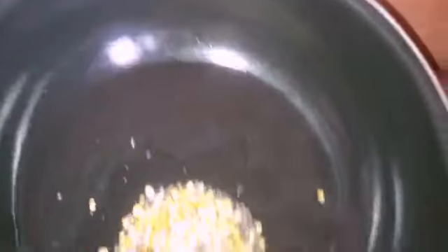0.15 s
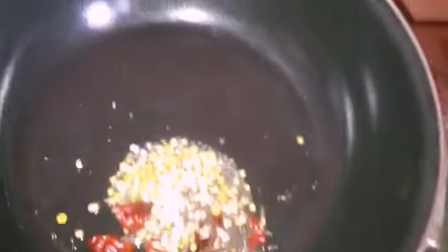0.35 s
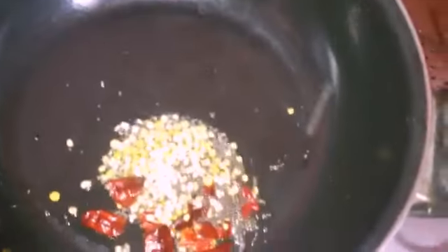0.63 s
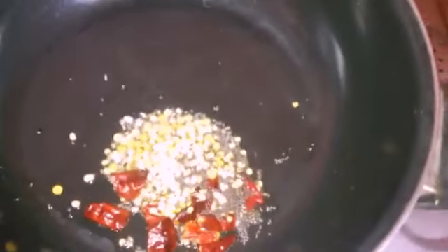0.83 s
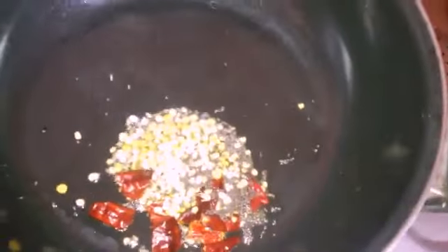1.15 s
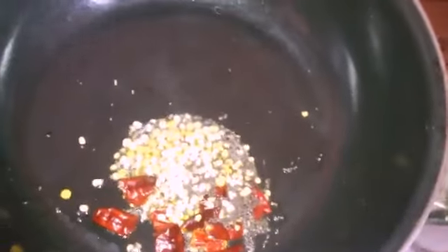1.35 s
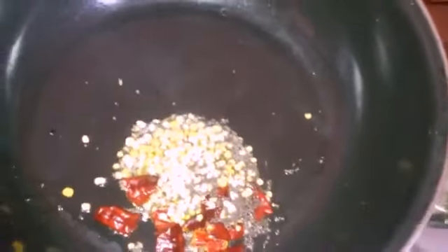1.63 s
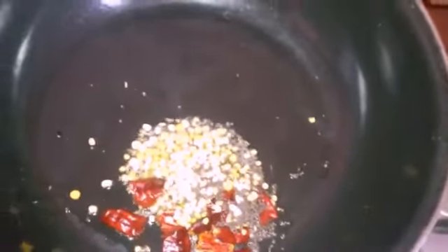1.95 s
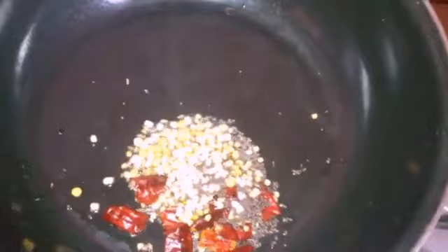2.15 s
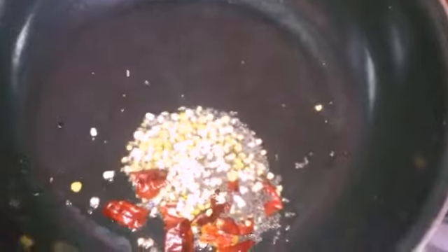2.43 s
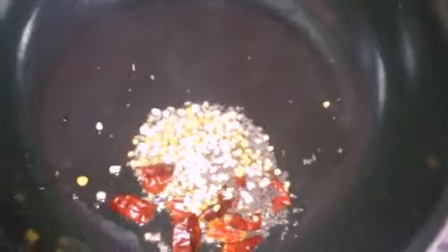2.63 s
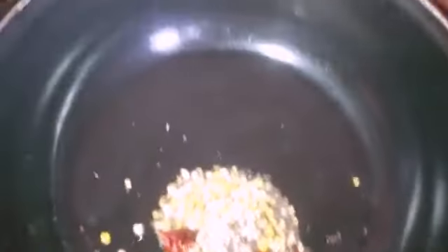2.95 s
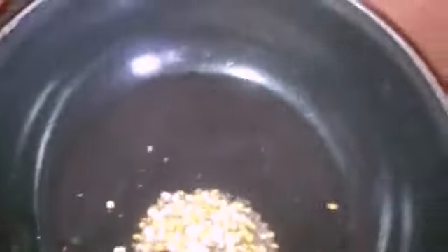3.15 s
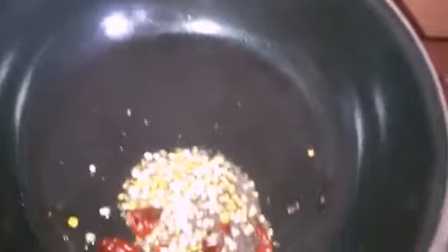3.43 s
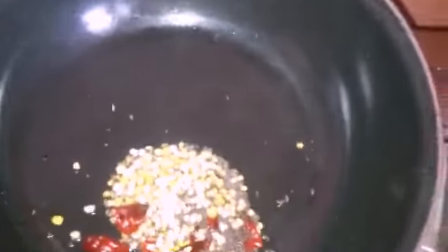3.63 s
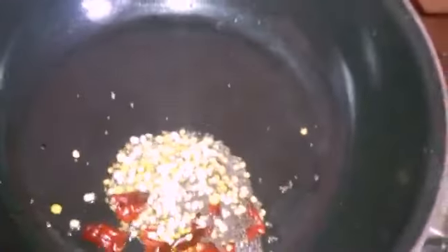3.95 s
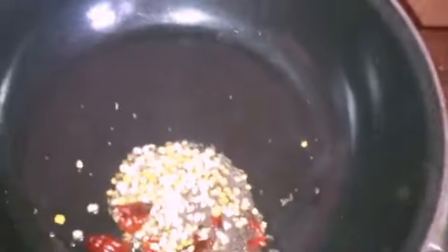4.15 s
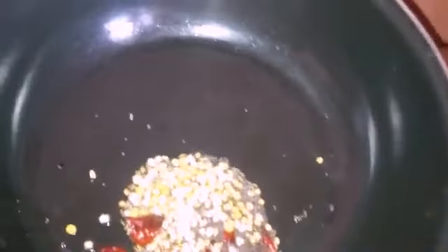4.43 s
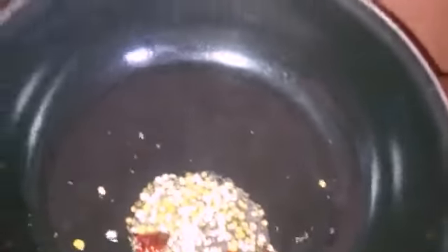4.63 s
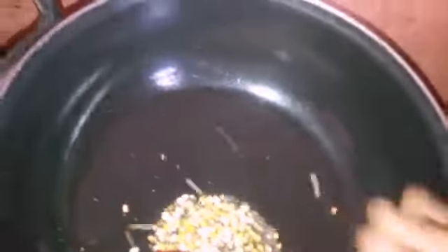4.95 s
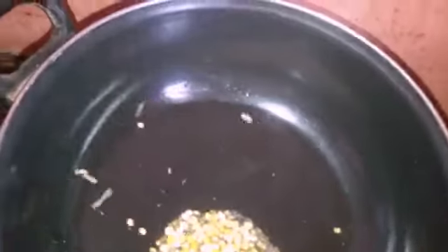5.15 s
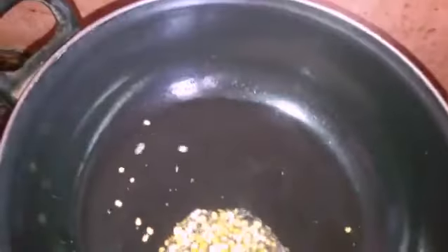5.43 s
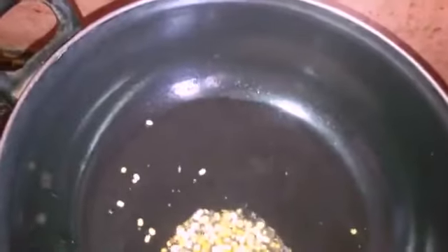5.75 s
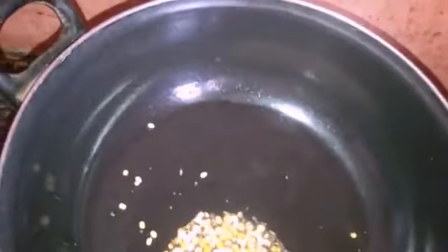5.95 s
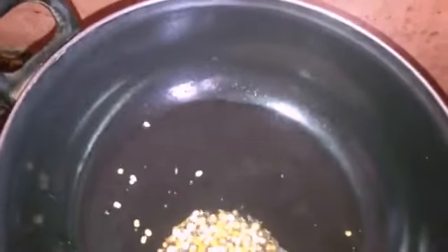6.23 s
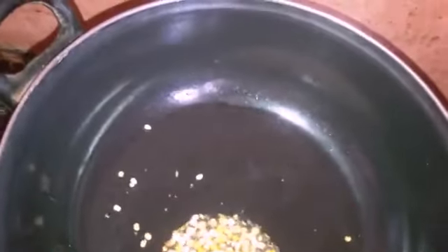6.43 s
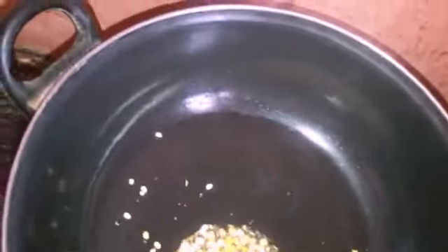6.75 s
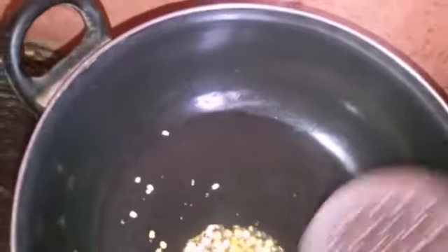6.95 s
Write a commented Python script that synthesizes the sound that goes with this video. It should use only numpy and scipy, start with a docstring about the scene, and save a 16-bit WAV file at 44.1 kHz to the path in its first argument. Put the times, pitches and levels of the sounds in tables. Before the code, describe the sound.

Close to a phone in a small kitchen, lentils and seeds fizz thinly in oil, with bright, dry pops at irregular gaps. Early on something is set down with a dull thud. Light steel touches and slides follow, then a firmer ringing clink past the middle. A cluster of hissing, whistling spits breaks out, and finally a spatula rasps and knocks out of its holder over the low flame drone.

```python
"""A pan of frying seeds fizzes and pops close by; something thuds, steel clinks and slides, a spatula clatters out.
Lentils, seeds and chillies fry in a little oil in a deep pan on a gas burner, heard by a phone in a small kitchen.
Random impulses make the fizz, short decaying sines the pops, whistling noise jets the bursting seeds.
Chattering or stick-slip noise drives the resonances of utensils and spatula; decaying sines make the thud boom.
Filtered noise makes the burner's rumble, drone and air."""
import sys
import numpy as np
from scipy import signal
from scipy.fft import rfft, irfft
from scipy.io import wavfile

SR = 44100
rng = np.random.default_rng(int(sys.argv[2]) if len(sys.argv) > 2 else 0)


def generate_wav(signal):
    """Clip the signal to [-1, 1] and save it as 16-bit WAV at the path in sys.argv[1]."""
    frames = np.transpose(np.atleast_2d(signal))
    scaled = np.clip(frames, -1, 1) * 32767
    pcm = np.round(scaled).astype(np.int16)
    wavfile.write(sys.argv[1], SR, pcm)


N = 312335
TIME = np.arange(N) / SR
WALL_LAG_S = .00058  # nominal delay of the pan wall's echo

# level of the fizz with the utensils' fine rattle, dipping in a lull: (time [s], level before trim [dB])
FIZZ_LEVEL = [(0.0, -42), (1.89, -42.5), (2.13, -38.5), (2.29, -43), (2.54, -48.5), (2.98, -47),
              (3.51, -41.5), (5.19, -42.5), (5.34, -39.5), (5.75, -42.5), (6.25, -46), (7.08, -44.5)]
# steel utensils touching: (time [s], relative ring level [dB], relative dull knock level [dB],
# chatter fading time before any stretch [s])
STEEL_CLINKS = [(2.0595, -48, -39, 0.002), (2.0632, -50, -39, 0.0025), (2.1106, -42, -36, 0.0026),
                (2.14, -44, -44, 0.0016), (4.275, -19.5, -56, 0.024), (4.3687, 3, -37, 0.0042),
                (4.3839, -4, -45, 0.017)]


def amp(db):
    """Decibels to gain."""
    return 10 ** (np.asarray(db) / 20)


def unit(x):
    """Scale to rms 1."""
    return x / np.sqrt(np.mean(x ** 2))


def curve(table, axis):
    """One column of a time table, joined by straight lines."""
    rows = np.array(table)
    return np.interp(TIME, rows[:, 0], rows[:, axis])


def add(track, s, sound):
    """Mix a sound into a track at time s."""
    i = max(int(s * SR), 0)
    track[i:i + len(sound)] += sound[:N - i]


def through(x, response):
    """Play x through an impulse response scaled to unit energy."""
    return signal.fftconvolve(x, response / np.linalg.norm(response))[:N]


def cut(x, hz, kind, order=2):
    """Low-pass or high-pass."""
    return signal.sosfilt(signal.butter(order, min(hz, .45 * SR), kind, fs=SR, output="sos"), x)


def tone(points, size=4096):
    """Causal (minimum-phase) impulse response with the given spectrum."""
    hz, db = np.transpose(points)
    bins_hz = np.arange(size // 2 + 1) * SR / size
    gain = amp(np.interp(np.log(bins_hz + 1), np.log(hz), db))
    cepstrum = irfft(np.log(gain))
    # fold the cepstrum onto positive time, so that nothing sounds before the impulse
    cepstrum[1:size // 2] *= 2
    cepstrum[size // 2 + 1:] = 0
    return irfft(np.exp(rfft(cepstrum)))


def ring(modes, sustain):
    """Impulse response of a struck body: decaying sines, sustain scaling every decay time."""
    t = TIME[:SR // 2]
    response = np.zeros(len(t))
    for hz, db, t60 in modes:
        fade = np.exp(-np.log(1000) * t / (t60 * sustain))
        response += amp(db) * np.sin(2 * np.pi * (hz * t + rng.random())) * fade
    return response


def resonate(x, peaks):
    """Band-pass resonances side by side, alternating in sign."""
    t = TIME[:SR // 2]
    response = np.zeros(len(t))
    for k, (hz, width, db) in enumerate(peaks):
        fade = np.exp(-np.pi * width * t)
        response += (-1) ** k * amp(db) * width * np.cos(2 * np.pi * hz * t) * fade
    return through(x, response)


def glide(x, hz, width):
    """A resonance whose centre moves; keeps the power of a broad input."""
    turn = np.exp(2j * np.pi * np.cumsum(hz) / SR)
    keep = np.exp(-np.pi * abs(width) / SR)
    # turn the centre down to 0 Hz, smooth there, then turn it back
    smoothed = signal.lfilter([np.sqrt(2 * (1 - keep ** 2))], [1, -keep], x / turn)
    return (turn * smoothed).real


def walk(rate):
    """Random drift joined by straight lines, spread near 1; holds still once its 2048 points run out."""
    knots = rng.standard_normal(2048)
    return np.interp(TIME * rate, np.arange(len(knots)), knots)


def shifting(x, peaks, drift=.008, patchy_db=3):
    """As the point of contact moves, each resonance of a body shifts in pitch and strength."""
    total = np.zeros(N)
    for hz, width, db in peaks:
        strength = amp(db + patchy_db * walk(25))
        total += strength * glide(x, hz * (1 + drift * walk(40)), width)
    return total


def grains(rate, spread_db):
    """Random tiny impulses of exponentially scattered level; rms 1."""
    size = amp(spread_db * np.minimum(rng.exponential(size=N), 6))
    return unit((rng.random(N) < rate / SR) * size * rng.choice([-1, 1], N))


def stick_slip(rate, scatter=0.31, spread_db=9.0, slip_s=0.00073):
    """Surfaces catch and let go at uneven intervals, each slip a short rasp; rms 1."""
    chance = rng.standard_normal((8192, 2))
    at = np.cumsum(SR / rate * np.exp(scatter * chance[:, 0])).astype(int)
    slips = np.bincount(at[at < N], amp(spread_db * chance[at < N, 1]), N)
    envelope = signal.lfilter([1], [1, -np.exp(-1 / (slip_s * SR))], slips)
    return unit(envelope * rng.standard_normal(N))


def bursts(times, dbs, fades):
    """Envelope of sudden contacts that each die away, summed as power."""
    power = np.zeros(N)
    for s, db, fade in zip(times, dbs, fades):
        add(power, s, amp(db) ** 2 * np.exp(-2 * TIME[:SR // 2] / max(fade, 1 / SR)))
    return np.sqrt(power)


def strokes(table):
    """Envelope of rubbing strokes that swell and fade as bell curves."""
    return sum(amp(db) * np.exp(-((TIME - s) / half) ** 2 / 2) for s, half, db, *_ in table)


def pan_wall(x):
    """Sound flutters briefly inside the bowl after its direct arrival."""
    t, flutter_s, flutter_db = TIME[:SR // 20], .002, -9.5
    flutter = rng.standard_normal(len(t)) * np.exp(-t / flutter_s) * (t > WALL_LAG_S)
    response = unit(flutter) * amp(flutter_db) / np.sqrt(len(t))
    response[0] += 1
    return through(x, response)


def kitchen_echo(x, t60_s=0.28, early_db=5, early_s=.0085, gap_s=.004):
    """Near walls answer after a short gap; the room rings on a little longer."""
    t = TIME[:SR // 2]
    fade = np.exp(-np.log(1000) * t / t60_s) + amp(early_db) * np.exp(-t / early_s)
    return through(x, rng.standard_normal(len(t)) * fade * (t > gap_s))


def burner():
    """The gas flame rumbles and drones under the pan, over the low noise of the kitchen."""
    # kitchen noise spectrum: (frequency [Hz], relative density [dB per Hz])
    kitchen_tone = [(15, -63), (25, -25.5), (134, 2), (199, -12), (251, -6.5), (335, -4), (496, -11.5),
                    (543, -15.5), (594, -9.5), (673, -24), (819, -17), (1380, -49), (1800, -37),
                    (2340, -48), (3960, -120)]
    rumble_db, drone_db, air_db = -56, -62, -50
    # the flame flares once: it builds, holds and settles, lifting the drone most
    start_s, attack_s, end_s, release_s = 3.04, 0.3, 5.35, 0.082
    flare_drone_db, flare_noise_db = 14.5, 2
    rise = (TIME - start_s) / attack_s
    fall = 1 - (TIME - end_s) / release_s
    flare = np.clip(np.minimum(rise, fall), 0, 1)
    # resonances as (frequency [Hz], width [Hz], level [dB])
    rumble = resonate(rng.standard_normal(N), [(99.2, 13.0, 0)]) * amp(rumble_db + 0.59 * walk(2.38))
    drone = resonate(rng.standard_normal(N), [(135.4, 4.0, 0)])
    drone = drone * amp(drone_db + flare_drone_db * flare + 1.0 * walk(2.5))
    air = through(rng.standard_normal(N), tone(kitchen_tone)) * amp(air_db + 0.07 * walk(12.0))
    return (rumble + air) * amp(flare_noise_db * flare) + drone


def thud():
    """Something set down: a dull blow rings the counter's modes, with a brief rattle."""
    # blow on the counter: (time [s], relative level [dB])
    landings = [(0.416, -15.5)]
    # counter modes: (frequency [Hz], relative level [dB], t60 before sustain scaling [s])
    counter_modes = [(172, -25, 0.53), (264, 0, 0.38), (296, -12, 0.57), (377, -6, 0.21), (449, -4, 0.39),
                     (578, -8, 0.24), (678, -10, 0.14), (797, -16, 0.19)]
    # rattle spectrum: (frequency [Hz], relative density [dB per Hz])
    rattle_tone = [(71, -63), (120, -27), (200, -13), (255, -8), (450, -1), (579, -12), (830, -19),
                   (1390, -26), (2380, -17), (3400, -37), (4410, -19), (7110, -16.5), (14000, -37)]
    s, db = np.transpose(landings)
    boom = np.zeros(N)
    response = ring(counter_modes, sustain=0.98)
    add(boom, s[0], amp(db[0] - 2) * response / np.abs(response).max())
    rattle = grains(rate=6200, spread_db=3.0) * bursts(s, db - 5.5, [.028])
    return boom + through(rattle, tone(rattle_tone))


def bump(level_db=-43.5, fade_s=0.12):
    """The counter rumbles briefly under each clink, in proportion to the blow on the steel."""
    s, ring_db, _, _ = np.transpose(STEEL_CLINKS)
    shake = rng.standard_normal(N) * bursts(s, ring_db + level_db, [fade_s] * len(s))
    return cut(resonate(shake, [(96, 19, 0)]), 65, "high", order=4)  # one mode at 96 Hz, 19 Hz wide


def taps(fade_s=0.0084, click_hz=1100, click_width_hz=700):
    """Small things are put down on the counter: soft knocks, some with a hollow click."""
    # things put down: (time [s], relative level [dB], click level added to it [dB])
    touches = [(1.453, -47.5, -32), (1.513, -41, -26), (1.555, -48, -22), (2.003, -50, 3),
               (2.243, -45, -20), (3.434, -50, 4), (4.044, -42, -3)]
    # counter resonances: (frequency [Hz], width [Hz], relative level [dB])
    tap_modes = [(247, 19, 0.5), (457, 13, 9), (578, 68, -4), (826, 57, -2)]
    s, db, click_db = np.transpose(touches)
    contact, fades = grains(rate=5400, spread_db=5.0), [fade_s] * len(s)
    body = resonate(contact * bursts(s, db, fades), tap_modes)
    click_tone = [(click_hz / 2, -25), (click_hz, 0), (click_hz + click_width_hz, -8), (4000, -40)]
    click = through(contact * bursts(s, db + click_db, fades), tone(click_tone))
    return amp(8.5) * body + click


def ticks():
    """A utensil held firmly touches something and stops at once, without ringing."""
    # light, dry touches: (time [s], level [dB], fading time [s])
    touches = [(2.7169, -27.5, 0.0059), (4.046, -36, 0.0068)]
    # touch spectrum: (frequency [Hz], relative density [dB per Hz])
    touch_tone = [(500, -14), (1200, -3), (2100, 4), (3300, -5), (4000, -8), (5150, 10), (6000, -5),
                  (8000, -15), (14000, -32)]
    s, db, fade = np.transpose(touches)
    return through(grains(rate=6600, spread_db=4.5) * bursts(s, db, fade), tone(touch_tone))


def utensils():
    """Steel chatters, rings, rubs and squeals; returns the free ring and the contact noise."""
    # steel sliding on steel: (middle [s], half length [s], relative rub level [dB],
    # mean squeal pitch [Hz], squeal level before grip [dB])
    slides = [(1.849, 0.011, -50, 3320, -38), (1.897, 0.013, -51, 3270, -33),
              (1.974, 0.0078, -29, 6130, -19.5), (2.122, 0.0081, -34.5, 3280, -22),
              (2.158, 0.0043, -36, 3330, -33), (2.205, 0.0044, -35, 3350, -40),
              (4.305, 0.02, -40.5, 3280, -36)]
    # free modes of the steel: (frequency [Hz], relative level [dB], t60 before sustain scaling [s])
    steel_modes = [(2814, -10, .17), (3365, -8, .11), (4414, -2, .2), (4506, -2, .16), (4600, -7, .2),
                   (4850, 0, .1), (5055, -5, .16), (5200, -9, .15), (5432, -13, .14), (5739, -1, .14),
                   (6140, -12, .17), (6715, -17, .13), (7427, -11, .11), (7730, -16, .1)]
    # modes while rubbed: (mean frequency [Hz], width [Hz], mean relative level [dB])
    slide_modes = [(474, 25, -2.5), (932, 25, -9), (1735, 30, -3), (2220, 100, -1), (2820, 40, -3),
                   (3275, 25, -2), (4620, 40, 2), (5090, 45, -1), (5480, 90, 2), (6170, 60, -4),
                   (6640, 45, -3)]
    # contact spectrum: (frequency [Hz], relative density [dB per Hz])
    contact_tone = [(120, -2), (200, -9), (476, -3.5), (1050, -8), (1750, -4.5), (1950, -16.5), (2750, -1),
                    (3060, -12.5), (3290, 8.5), (3800, -34), (4550, -0.5), (5450, 1.5), (6500, -1),
                    (8000, -7), (11900, -12.5), (15000, -75)]
    s, ring_db, knock_db, fade = np.transpose(STEEL_CLINKS)
    chatter = grains(rate=5000, spread_db=1.0)
    blows = amp(-11.5) * chatter * bursts(s, ring_db, fade)
    for start, db in zip(s, ring_db):
        add(blows, start, amp([db + 11.5]))  # one sharp first impact
    ringing = amp(-3.5) * through(blows, ring(steel_modes, sustain=0.36))
    knocks = chatter * bursts(s, knock_db, fade * 1.82)
    rub = stick_slip(rate=500) * strokes(slides)
    modes = amp(-11.0) * shifting(rub + amp(13.0) * knocks, slide_modes)
    body = modes + through(amp(-3.5) * rub + amp(16.5) * knocks, tone(contact_tone))
    # stick and slip locks onto one wavering mode, its grip varying at random
    waver_hz = 95 * walk(500) + 25 * walk(40)
    grip = amp(4.5 * walk(170) - 5.5)
    squeal = np.zeros(N)
    for s, half, _, hz, db in slides:
        squeal += strokes([(s, half, db)]) * np.sin(2 * np.pi * np.cumsum(hz + waver_hz) / SR)
    return ringing, body + grip * squeal


def spatula(rasp_db=-9, overtone=2.0, overtone_db=-2):
    """The spatula judders and knocks along its holder, rasping at a shifting pitch; knocks also shake the bass."""
    # knocks on the holder: (time [s], relative level [dB], relative bass level [dB], rattle fading time [s])
    holder_knocks = [(5.844, -16, -36.5, 0.014), (5.9083, -17.5, -42, 0.014), (6.064, -18, -35, 0.017),
                     (6.087, -5.5, -21.5, 0.018), (6.099, -29, -22.5, 0.017), (6.447, -19, -49, .006),
                     (6.4702, -6.5, -16.5, 0.0095)]
    # drags: (middle [s], half length [s], relative level [dB], mean rasp pitch [Hz])
    drags = [(5.87, 0.03, -40, 3020), (5.98, 0.032, -41.5, 2520), (6.035, 0.016, -51, 2640),
             (6.078, 0.025, -36, 2730), (6.16, 0.078, -42, 2250), (6.432, 0.033, -43.5, 2840),
             (6.457, 0.0075, -36, 2630), (6.53, 0.053, -42, 2400)]
    # holder resonances: (mean frequency [Hz], width [Hz], mean relative level [dB])
    holder_modes = [(262, 15, -0.5), (503, 12, -3), (685, 12, 1), (938, 20, -8), (1196, 52, -0.5),
                    (1560, 84, -3.5), (2060, 50, 0.5), (2450, 82, 1), (2860, 29, -20), (3210, 30, -13)]
    # clatter spectrum: (frequency [Hz], relative density [dB per Hz])
    clatter_tone = [(76, -39), (130, 0.5), (200, -21), (255, -4), (492, -4.5), (600, -6), (663, 2.5),
                    (793, 0), (1150, -5.5), (1560, 0.5), (1790, -5), (2560, -0.5), (3380, -8), (5670, -2.5),
                    (12100, -18.5), (15000, -38)]
    s, db, bass_db, fade = np.transpose(holder_knocks)
    chatter = grains(rate=2400, spread_db=1.8)
    drag = stick_slip(rate=300, spread_db=3.2, slip_s=.001) * strokes(drags) * amp(2 * walk(70))
    blows = amp(-6.5) * chatter * bursts(s, db, fade)
    contact = cut(blows, 2000, "high") + cut(drag, 330, "high")
    shake = amp(9.0) * cut(cut(chatter * bursts(s, bass_db, fade), 600, "low"), 186, "high")
    force = contact + shake
    pitch_hz, width_hz = curve(drags, axis=3) * (1 + .04 * walk(60)), 260
    scrape = drag + amp(-9.0) * blows
    rasp = glide(scrape, pitch_hz, width_hz)
    rasp = rasp + amp(overtone_db) * glide(scrape, overtone * pitch_hz, overtone * width_hz)
    clatter = amp(-1.5) * through(force, tone(clatter_tone))
    return clatter + amp(-15.5) * shifting(force, holder_modes) + amp(rasp_db) * rasp


def crackles(rate=260, spread_db=2.5, cycles=0.95, low_hz=3000, high_hz=10000):
    """Lone small bubbles tick at one of eight pitches and flutter in the pan; rms 1."""
    total = np.zeros(N)
    for hz in np.geomspace(low_hz, high_hz, 8):
        total += resonate(grains(rate / 8, spread_db), [(hz, hz / (np.pi * cycles), 0)])
    return unit(pan_wall(total))


def fizz(trim_db=-0.5):
    """Thousands of tiny bubbles merge to a hiss, with lone crackles on top."""
    # hiss spectrum: (frequency [Hz], relative density [dB per Hz])
    fizz_tone = [(530, -8), (900, -8), (1110, -7), (1720, -8.5), (2540, -2.5), (2750, -2), (3700, -5.5),
                 (5710, 3), (8040, -4), (10700, -8), (12400, -6.5), (14400, -10.5), (15000, -44)]
    bubbles = grains(rate=7000, spread_db=-0.7) * amp(1.9 * walk(12) + 2 * walk(90))
    lone = amp(-9.5) * crackles()
    return through(bubbles + lone, tone(fizz_tone)) * amp(curve(FIZZ_LEVEL, axis=1) + trim_db)


def spits(whistle_width_hz=650, tick_db=-12, tick_fade_s=0.019, edge_s=0.00058):
    """Split seeds whistle steam and throw ticking droplets; returns the sound and the feed of its uneven echo."""
    # bursting seeds: (start [s], length [s], relative level [dB], whistle pitch [Hz],
    # whistle level added to the jet [dB], level of this burst's echo that differs between the ears [dB])
    seed_bursts = [(2.242, 0.0099, -25.5, 6300, -8, -56), (4.008, 0.013, -44, 5260, 10, -51),
                   (5.148, 0.006, -18.5, 2950, -4.5, -7), (5.1564, 0.0056, -20.5, 5600, -8, -9),
                   (5.172, 0.014, -20, 6800, 3, -8), (5.1757, 0.0062, -16, 6650, -14, -33),
                   (5.217, 0.0055, -25, 6300, -6, -26), (5.239, 0.011, -28, 6640, -2.5, -37),
                   (5.331, 0.0044, -17, 2880, -14, -24), (5.335, 0.0043, -23, 6800, -3.5, -32),
                   (5.4869, 0.0065, -25.5, 2720, -9.5, -53), (5.5628, 0.0066, -27, 5800, -14, -51),
                   (5.63, .009, -33.5, 5950, -5, -47)]
    # jet and droplet spectrum: (frequency [Hz], relative density [dB per Hz])
    spit_tone = [(530, 18.5), (900, 2), (1170, -0.5), (1440, -13), (2130, -9), (2500, -2), (3530, -19.5),
                 (4600, -12), (5400, 2.5), (6820, -9), (7600, -3), (10500, -12.5), (14200, -13),
                 (15000, -22)]
    s, length, db, hz, whistle_db, uneven_db = np.transpose(seed_bursts)
    latest = np.maximum(np.searchsorted(s, TIME) - 1, 0)  # row of the most recent burst
    vent = np.zeros(N)
    for start, span, level in zip(s, length, db):
        vent += amp(level) ** 2 * ((TIME > start) & (TIME < start + span))
    # soften the edges of each opening
    opening = signal.lfilter([1], [1, -np.exp(-1 / (edge_s * SR))], np.sqrt(vent)) / (edge_s * SR)
    jet = grains(rate=9000, spread_db=1.5) * opening
    droplets = amp(tick_db) * grains(rate=450, spread_db=2.0) * bursts(s, db, [tick_fade_s] * len(s))
    whistle = glide(jet * amp(whistle_db[latest]), hz[latest], whistle_width_hz)
    hiss = amp(9.5) * through(jet + droplets, tone(spit_tone))
    sound = cut(hiss + whistle, 1700, "high", order=4)
    return sound, sound * amp(uneven_db[latest])


def faint_pops(seed_hz=2900, seed_db=-15):
    """Small bubbles burst at random, softer when the fizz is low; rows as in the table of pops."""
    per_s, mean_db, mean_hz, snap_db = 5.6, -46.5, 5400, -17
    scatter_db, scatter_octaves = 5.5, 0.29
    chance = rng.standard_normal((64, 4))
    gaps = (chance[:, 0] ** 2 + chance[:, 1] ** 2) / 2  # exponential waiting times, mean 1
    times = np.cumsum(gaps) / per_s
    fizz_s, fizz_db = np.transpose(FIZZ_LEVEL)
    dbs = mean_db + scatter_db * chance[:, 2] + np.interp(times, fizz_s, fizz_db - fizz_db.mean())
    pitches = mean_hz * 2 ** (scatter_octaves * chance[:, 3])
    last_s = TIME[-1] - WALL_LAG_S * 2
    return [(s, db, hz, snap_db, seed_hz, seed_db) for s, db, hz in zip(times, dbs, pitches) if s < last_s]


def pops(rise_s=.0001, snap_db=6, snap_hz=10000, snap_s=0.00012, crack_hz=13000, crack_db=-2,
         crack_s=0.00028, seed_s=0.00025, gain_db=5):
    """A bursting bubble's cavity rings briefly and jolts a seed; returns the direct sound and the room's share."""
    # louder steam pops: (time [s], level before gain [dB], cavity pitch [Hz], treble level before snap and
    # crack offsets [dB re cavity], jolted seed's pitch [Hz], seed level [dB re cavity])
    loud_pops = [(0.0404, 2.5, 6000, -21, 2500, -17.5), (0.057, -26, 6700, 4, 3000, -12),
                 (0.093, -5, 6800, -8.5, 4170, -6.5), (0.2798, -2.5, 6200, -12.5, 2500, -13),
                 (0.539, -6, 5450, -38, 4920, -6), (0.599, -9.5, 5630, -11.5, 3200, -17),
                 (0.6416, 4, 5400, -19.5, 2460, -11.5), (0.708, -6.5, 6640, -9.5, 2870, -8.5),
                 (0.8, -7.5, 6400, -28, 2880, -17), (0.9997, -1, 6940, -18, 2880, -23.5),
                 (1.2117, -1, 5270, -34, 2950, -38), (1.235, -1.5, 5400, -14, 2400, -5),
                 (2.0447, -3.5, 5800, -21, 2850, -4.5), (2.2314, -0.5, 5850, -9, 2820, -12.5),
                 (2.7715, -28, 5500, -16, 2600, -2), (3.342, -18.5, 7500, -6, 2700, -29),
                 (3.412, -14, 5900, -13, 2700, -40), (3.465, -11, 7460, -5, 2700, -34),
                 (3.5445, -2, 6300, -14, 2680, -12.5), (3.6426, -18.5, 5340, -2, 2650, 0.5),
                 (4.197, 2.5, 5730, -10.5, 2570, -17), (4.32, -12.5, 5770, -7.5, 2700, -22),
                 (4.346, -12.5, 4900, -4, 2680, -14), (4.842, -13, 4460, -32, 2700, -17),
                 (4.886, -13.5, 5550, -16, 2700, -33), (4.9363, -10, 5660, -20, 3600, -30),
                 (5.3919, -4, 6030, -13, 2760, -19), (5.442, -11.5, 5540, -22, 2700, -34),
                 (5.6997, 2.5, 5700, -12, 2600, -14.5), (6.344, -12, 5500, -41, 3900, -5),
                 (6.572, -17, 6130, -30, 3100, -10), (6.896, -15.5, 5540, -17, 2580, -6.5)]
    # every cavity fades over the same few cycles and sends the same share into the room
    pop_cycles, room_db = 1.05, -4
    floor_lag_s, floor_echo, wall_echo = .00027, .35, .55
    direct, t = np.zeros(N), TIME[:384]
    places = rng.uniform(.75, 1.15, 128)
    for (s, db, hz, treble_db, seed_hz, seed_db), place in zip(loud_pops + faint_pops(), places):
        # (pitch [Hz], level [dB], fading time [s])
        parts = [(hz, 0, pop_cycles / hz), (snap_hz, treble_db + snap_db, snap_s),
                 (crack_hz, treble_db + crack_db, crack_s), (seed_hz, seed_db, seed_s)]
        cavity, snap, crack, jolt = (
            amp(level) * np.sin(2 * np.pi * f * t) * np.exp(-t / fade) for f, level, fade in parts)
        pop = amp(db + gain_db) * (cavity - snap + crack - jolt) * (1 - np.exp(-t / rise_s))
        # echoes off floor and wall come sooner or later with the bubble's place, colouring each pop
        echoes = ((0, 1), (floor_lag_s * place, floor_echo), (WALL_LAG_S * place, wall_echo))
        for lag, share in echoes:
            add(direct, s + lag, pop * share)
    direct = cut(direct, 1940, "high", order=5)
    return pan_wall(direct), amp(room_db) * pan_wall(direct)


def scene():
    """The pan is straight ahead; only echoes of some spits and of ringing steel differ between the ears."""
    direct, outward = pops()
    spitting, uneven = spits()
    ringing, rubbing = utensils()
    counter = thud() + taps()
    handling = ringing + rubbing + spatula()
    dry_ticks = ticks()
    room = amp(-2.0) * outward + amp(-2.5) * spitting + amp(-1.0) * handling
    room = room + amp(-3.0) * counter + amp(-3.5) * dry_ticks
    near = direct + fizz() + spitting + handling + dry_ticks + counter
    mid = near + bump() + burner() + kitchen_echo(room)
    side = kitchen_echo(uneven + amp(-21.5) * ringing)
    return np.array([mid + side, mid - side])


def record(dry, top_hz=14700):
    """The phone rounds the sharpest peaks and cuts the top."""
    rounded = np.tanh(1.1 * dry) / 1.1
    return signal.sosfilt(signal.ellip(8, .2, 90, top_hz, fs=SR, output="sos"), rounded)


dry = scene()
out = record(dry)
generate_wav(out)
```